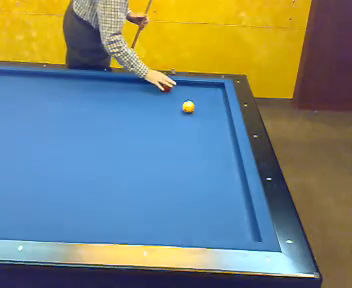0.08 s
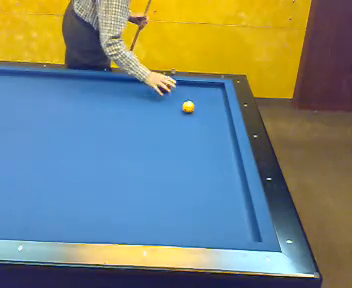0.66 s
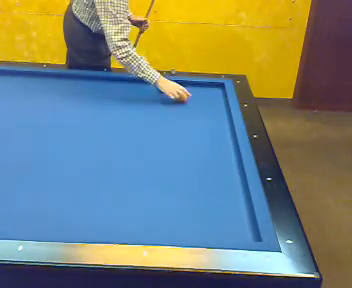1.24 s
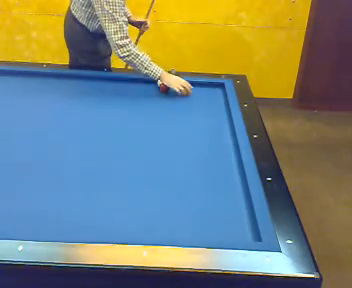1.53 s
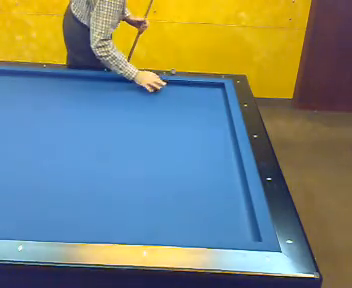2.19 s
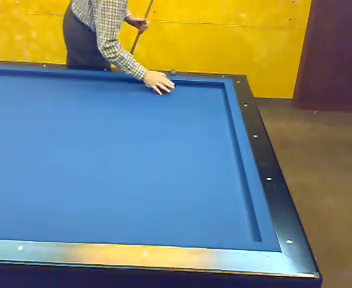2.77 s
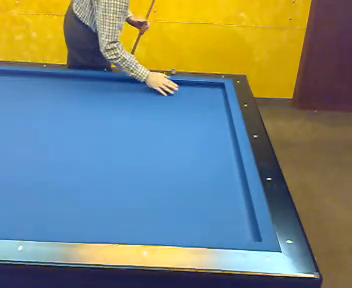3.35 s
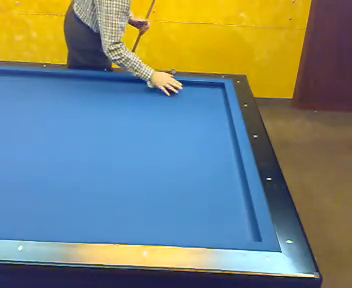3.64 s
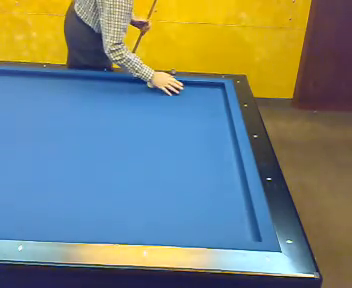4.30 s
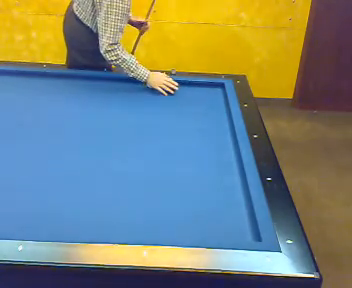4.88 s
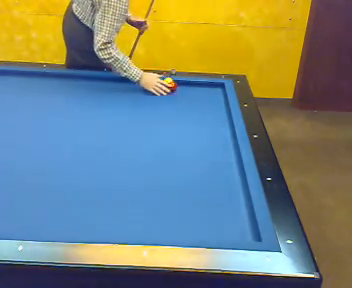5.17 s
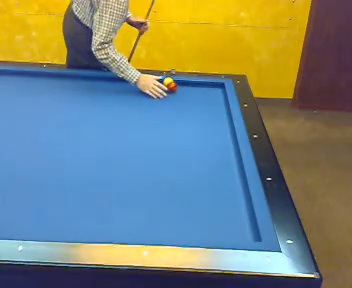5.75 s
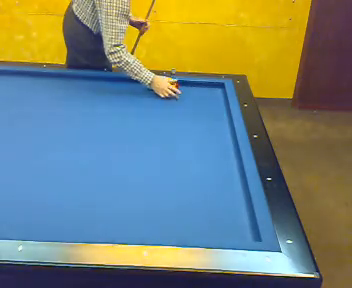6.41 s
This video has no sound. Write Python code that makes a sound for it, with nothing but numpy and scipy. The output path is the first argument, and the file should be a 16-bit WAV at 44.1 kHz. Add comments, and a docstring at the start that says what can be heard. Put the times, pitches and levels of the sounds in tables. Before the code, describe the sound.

Billiard balls clack together as they are gathered by hand, a loud cluster then gentler taps, over a steady ventilation hum.

```python
"""A steady hum of ventilation and mains power comes first, with one soft clack of billiard balls.
Then the balls are gathered by hand and nudged together at the far cushion: a quick, loud cluster of
clacks, then gentler ones. Each clack comes back from the table, the walls and the hall.
The cushion thuds, the cloth rustles and a few tiny ticks sound. A camera's electronics whine thinly."""
import sys
import numpy as np
from scipy import signal
from scipy.fft import rfft, irfft
from scipy.io import wavfile
from scipy.ndimage import uniform_filter1d

SR = 44100
rng = np.random.default_rng(int(sys.argv[2]) if len(sys.argv) > 2 else 0)


def inscribe(sig):
    """Save sig as 16-bit PCM at rate SR to the path in sys.argv[1].

    A 1-D sig is mono; a 2-D sig holds one channel per row.
    Samples are clipped to [-1, 1] before scaling.
    """
    pcm = np.round(np.clip(np.atleast_2d(sig).T, -1, 1) * 32767)
    wavfile.write(sys.argv[1], SR, pcm.astype(np.int16))


N = 284004

# ball hitting ball: t/s, peak level before echoes/dB, boost of the low knock/dB
BALL_HITS = [ (0.2600, -39, 14), (2.0863, -12.5, -1), (2.1283, -18, -4), (2.1405, -16.5, -3.5),
             (2.1626, -17, -1.5), (2.1939, -21.5, -3), (2.4012, -23.5, 4.5), (2.4286, -30.5, -0.5),
             (2.7191, -26, 6), (2.7818, -31.5, 7), (3.0606, -25.5, 7.5), (3.3056, -38.5, -3.5),
             (3.5240, -39, 1), (3.9166, -30.5, 10), (4.0963, -37.5, 4), (4.4121, -45, 3), ]
# tone colour of a clack that comes straight to the listener: f/Hz, relative level/dB
DIRECT_COLOUR = [(200, -39.5), (500, -26), (900, -14), (1300, -8), (1620, 1), (1850, -5.5), (2050, -4),
                 (2350, -12), (2800, -17.5), (3300, -19.5), (4500, -25), (7500, -42.5)]
# tone colour of a clack as the hall returns it: f/Hz, relative level/dB
HALL_COLOUR = [(200, -30.5), (480, -15.5), (680, -12), (830, -7.5), (980, -8.5), (1220, -3), (1400, -0.5),
               (1600, -2), (1830, -3.5), (2050, -12), (2300, -11), (3000, -19), (4100, -14), (5200, -37.5)]
# first echoes from table, wall and ceiling: delay/s, relative level/dB
FIRST_ECHOES = [(.0025, -11.5), (.0036, -6), (0.0146, -7), (0.0185, -13), (.0268, -12)]
# how long the hall rings: f/Hz, time to fade by 60 dB/s
HALL_FADE = [(300, .7), (1100, 0.58), (2000, 0.45), (5000, 0.49)]
# borders of the bands in which the hall's sound fades: f/Hz
HALL_BANDS = [0, 700, 1400, 2400, 4000, 9000]
# tones that linger after every clack: f/Hz, relative level/dB, time to fade by 60 dB/s
LINGERING_TONES = [(1188, -6, .55), (1597.5, 0, .55), (1673.4, -2, .5)]
# a ball bumping the cushion: t/s, peak level/dB
CUSHION_THUDS = [(1.336, -29.5), (2.404, -31.5)]
# faint high ticks: t/s, peak level/dB
HIGH_TICKS = [(1.1624, -48), (2.811, -48), (4.4579, -50.5), (6.1100, -51)]
# hand and balls sliding on the cloth: middle t/s, length/s, level/dB, centre f/Hz
CLOTH_SLIDES = [(0.719, .24, -59, 1490), (1.278, 0.12, -59, 1520), (1.653, .16, -55.5, 650)]
# pitches of the mains hum and fan tones: f/Hz
HUM_PITCHES = [100.2, 117, 200.2, 218, 242.5, 484.5, 548.6, 963.6]
# strength of those tones, in the same order: level/dB, amount of wavering (0 to 1)
HUM_LEVELS = [(-37, 0.16), (-48.5, 0.7), (-53, .4), (-55.5, 0.66), (-56.5, .4), (-64, 0.6), (-60.5, 0.1),
              (-69.5, 0.6)]
# tone colour of the rumble in the air ducts: f/Hz, relative level/dB
DUCT_COLOUR = [(15, -14.5), (28, -6.5), (42, 2.5), (54, -4.5), (75, -1.5), (104, 0), (135, -2),
               (162, -15.5), (205, -11), (270, -17), (400, -25), (800, -60)]
# tone colour of moving air and microphone hiss: f/Hz, relative level/dB
AIR_COLOUR = [(150, -8.5), (300, 2.5), (480, 1), (700, -5), (1050, -4.5), (1500, -7), (2000, -12.5),
              (2700, -17), (3400, -16.5), (4400, -22), (5800, -26.5), (7400, -29.5)]
# overtones of the whine: multiple of the switching rate, relative level/dB
WHINE_OVERTONES = [(10, -79.5), (11, -84), (12, -81.5), (13, -72.5), (14, -68.5), (15, -74.5), (16, -76.5),
                   (17, -69.5), (18, -77), (19, -83.5), (20, -74.5), (21, -72.5), (22, -71), (23, -81.5),
                   (24, -78), (25, -83)]


def ball_clacks(hall_db=3.0, ring_db=-6, knock_hz=950, size=2048):
    """Two hard balls meet with a short clack; echoes, the hall's wash and lingering tones follow."""
    out, hz = np.zeros(N), frequencies(size)
    for start, db, knock_db in BALL_HITS:
        push = contact_push(db, size)
        # a ball pressed on the table passes more of the blow into it, which adds a low knock
        knock = knock_db / (1 + (hz / knock_hz) ** 4)
        direct = signal.fftconvolve(push, pulse(gain(look_up(DIRECT_COLOUR, hz) + knock), size))
        to_hall = signal.fftconvolve(push, pulse(gain(look_up(HALL_COLOUR, hz) + knock), size))
        direct *= gain(db) / np.abs(direct).max()
        to_hall /= np.linalg.norm(to_hall)
        add(out, start, direct)
        for delay, echo_db in FIRST_ECHOES:
            add(out, start + delay, direct * gain(echo_db))
        hall_gain = gain(hall_db) * np.linalg.norm(direct)
        add(out, start, hall_gain * signal.fftconvolve(to_hall, hall_tail()))
        add(out, start, hall_gain * gain(ring_db) * lingering_tones())
    return out


def contact_push(db, size, gentle_hz=1885, rise_hz=770, hard_db=-12.5, steepness=9, leak_db=-22):
    """The push between two balls: a harder blow is over sooner, so it sounds brighter."""
    edge_hz = gentle_hz + rise_hz * gain(db - hard_db) ** 1.56
    push = pulse(1 / np.sqrt(1.5 + (frequencies(size) / edge_hz) ** (2 * steepness)), size)
    push[0] += gain(leak_db)  # a little treble remains above the edge
    return push


def hall_tail(gap_s=0.003, build_s=0.006):
    """The hall's many echoes blur into a wash that builds after a short gap; the bass lasts longest."""
    t, hz = np.arange(SR) / SR, frequencies(SR)
    spectrum, tail = rfft(rng.standard_normal(SR)), 0
    for low, high in zip(HALL_BANDS, HALL_BANDS[1:]):
        band = irfft(spectrum * ((hz >= low) & (hz < high)), SR)
        fade_s = look_up(HALL_FADE, (low + high) / 2)
        tail = tail + band * gain(-60 * t / fade_s)
    tail *= 1 - np.exp(-np.maximum(t - gap_s, 0) / build_s)
    return tail / np.sqrt(np.sum(tail ** 2) * SR / 2 / HALL_BANDS[-1])


def lingering_tones():
    """A few pure tones ring on after a clack and die away."""
    t = np.arange(SR) / SR
    ring = sum(gain(db - 60 * t / fade_s) * np.sin(2 * np.pi * (hz * t + rng.random()))
               for hz, db, fade_s in LINGERING_TONES)
    return ring / np.linalg.norm(ring)


def cushion_thuds(frame_hz=108, rise_s=0.022):
    """The rubber catches the ball softly, so the table frame answers with one low swell."""
    out, t = np.zeros(N), np.arange(SR // 4) / SR
    swell = t / rise_s * np.exp(1 - t / rise_s)
    for start, db in CUSHION_THUDS:
        add(out, start, gain(db) * swell * np.sin(2 * np.pi * frame_hz * t))
    return out


def ticks(centre_hz=5000, width_hz=900, decay_s=0.0029):
    """Tiny dry ticks, each a few thousandths of a second of high ringing."""
    out, t = np.zeros(N), np.arange(SR // 20) / SR
    ring_filter = signal.iirpeak(centre_hz, centre_hz / width_hz, fs=SR)
    for start, db in HIGH_TICKS:
        burst = rng.standard_normal(len(t)) * np.exp(-t / decay_s)
        tick = signal.lfilter(*ring_filter, burst)
        add(out, start, gain(db) * tick / np.abs(tick).max())
    return out


def cloth_rustles(flicker_db=3):
    """Hand and balls rub over the cloth in faint, uneven swells of noise."""
    out = np.zeros(N)
    for middle, length, db, hz in CLOTH_SLIDES:
        rub = noise([(hz / 2, -20), (hz, 0), (hz * 2, -20), (SR / 2, -80)])
        rub *= gain(flicker_db * drift(41))
        swell = np.hanning(int(length * SR))
        add(out, middle - length / 2, gain(db) * swell * rub[:len(swell)])
    return out


def ventilation(rumble_db=-40, air_db=-51.0, sway_db=0.47, whistle_hz=3240, whistle_db=-73.0):
    """Mains and fans hum over rumbling ducts and moving air, with a faint, unsteady whistle."""
    hum = sum(gain(db) * wavering_tone(hz, waver, rate_hz=6)
              for hz, (db, waver) in zip(HUM_PITCHES, HUM_LEVELS))
    rumble = gain(rumble_db) * noise(DUCT_COLOUR)
    air = gain(air_db + sway_db * drift(9)) * noise(AIR_COLOUR)
    whistle = gain(whistle_db + 1.2 * drift(16)) * wavering_tone(whistle_hz, waver=1.6, rate_hz=50)
    return hum + rumble + air + whistle


def camera_whine(switching_hz=292.97, volume_db=-0.26, scatter_radians=0.54, size=2048):
    """The electronics switch rapidly and each pulse rings briefly, so the overtones stay in step."""
    hz, t = frequencies(size), np.arange(N) / SR
    one_pulse = pulse(gain(look_up(WHINE_OVERTONES, hz / switching_hz)), size)
    pulse_phases = np.unwrap(np.angle(rfft(one_pulse)))
    out = np.zeros(N)
    for multiple, db in WHINE_OVERTONES:
        pitch = multiple * switching_hz
        phase = np.interp(pitch, hz, pulse_phases) + scatter_radians * rng.standard_normal()
        out += gain(db) * normalise(np.cos(2 * np.pi * pitch * t + phase))
    return gain(volume_db) * out


def wavering_tone(hz, waver, rate_hz):
    """A tone whose loudness and phase (its place in the cycle) wander."""
    wander = 1 + waver * (drift(rate_hz) + 1j * drift(rate_hz))
    steady = np.exp(2j * np.pi * (hz * np.arange(N) / SR + rng.random()))
    return normalise(np.real(wander * steady))


def noise(colour):
    """Noise of strength 1 with the given tone colour."""
    white = rfft(rng.standard_normal(N))
    return normalise(irfft(white * gain(look_up(colour, frequencies(N))), N))


def drift(rate_hz):
    """A smooth random wobble of strength 1."""
    hold = int(SR / rate_hz)
    steps = np.repeat(rng.standard_normal(N // hold + 1), hold)
    return normalise(uniform_filter1d(uniform_filter1d(steps, hold), hold)[:N])


def pulse(strengths, size):
    """A click with the given strength at each frequency, packed as close to its start as possible."""
    cepstrum = irfft(np.log(strengths + 1e-9))
    cepstrum[1:size // 2] *= 2
    cepstrum[size // 2 + 1:] = 0
    return irfft(np.exp(rfft(cepstrum)))


def look_up(points, hz):
    """Read between the rows of a (frequency, value) table, with octaves evenly spaced."""
    f, value = np.transpose(points)
    return np.interp(np.log(np.maximum(hz, 1)), np.log(f), value)


def frequencies(size):
    """The frequencies in Hz that make up a sound of this many samples."""
    return np.arange(size // 2 + 1) * SR / size


def gain(db):
    """Turn decibels into a number to multiply by."""
    return 10 ** (np.asarray(db) / 20)


def normalise(x):
    """Scale to an average strength (rms) of 1."""
    return x / np.sqrt(np.mean(x ** 2))


def add(out, start_s, sound):
    """Mix a sound in at the given time."""
    i = int(start_s * SR)
    out[i:i + len(sound)] += sound[:N - i]


def scene():
    """The sounds of the table and the steady background, mixed into one channel."""
    return (ball_clacks() + cushion_thuds() + cloth_rustles() + ticks()
            + ventilation() + camera_whine())[None]


def record(dry, cutoff_hz=7550):
    """The camera cuts away the highest treble."""
    return signal.sosfilt(signal.ellip(10, 0.2, 70, cutoff_hz, fs=SR, output="sos"), dry)


dry = scene()
out = record(dry)
inscribe(out)
```